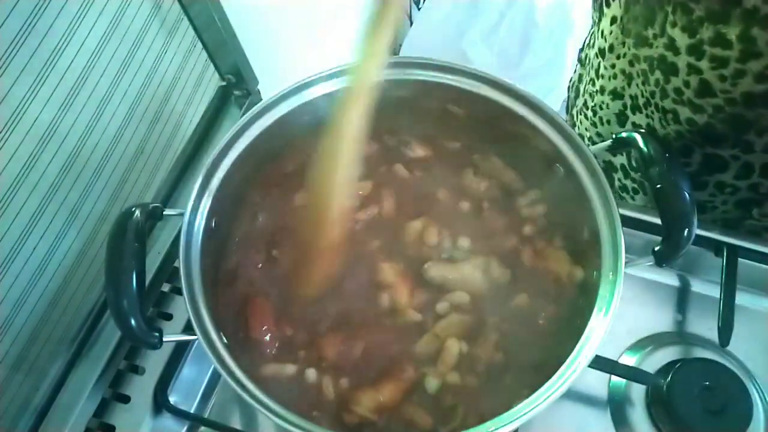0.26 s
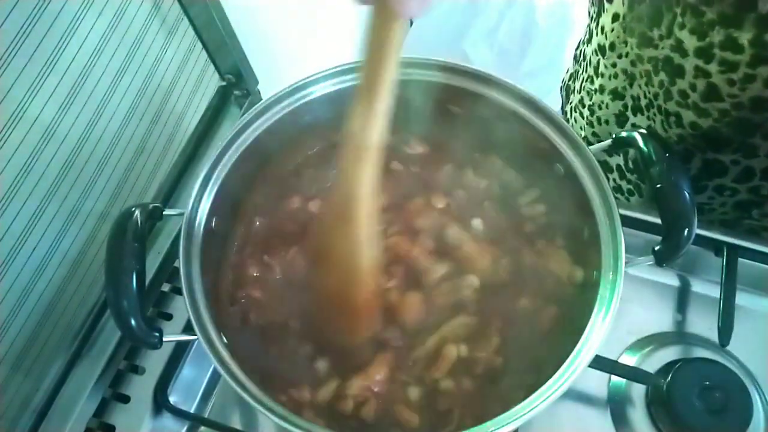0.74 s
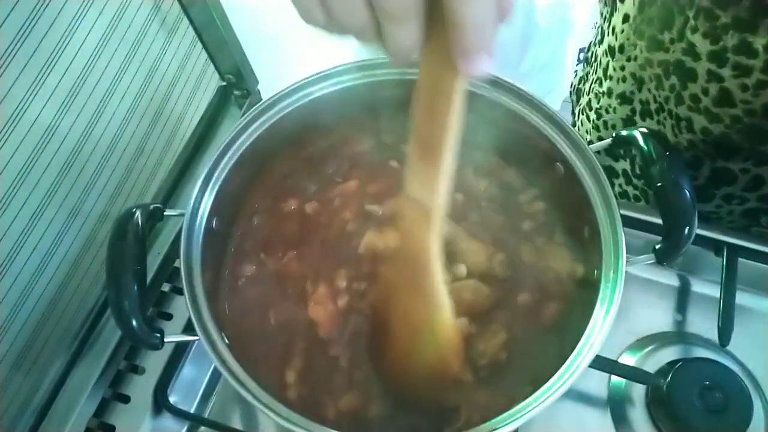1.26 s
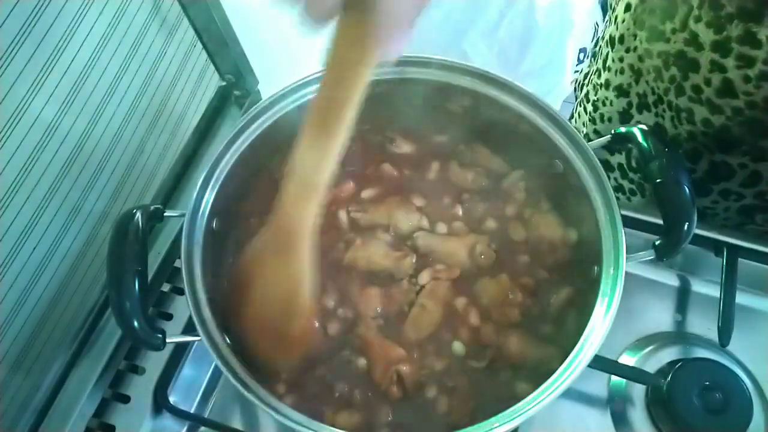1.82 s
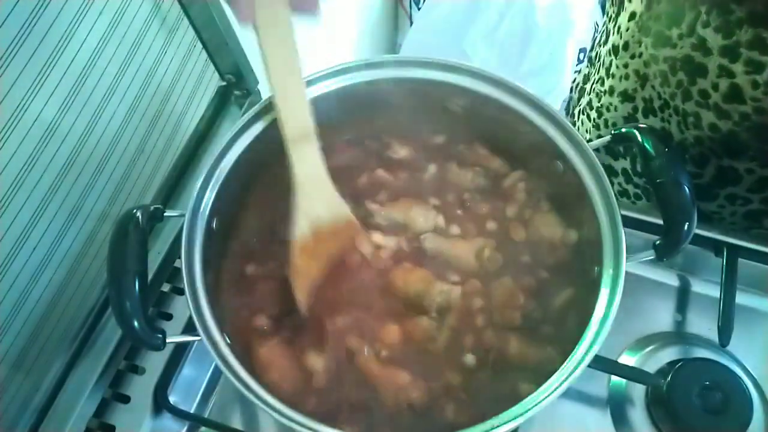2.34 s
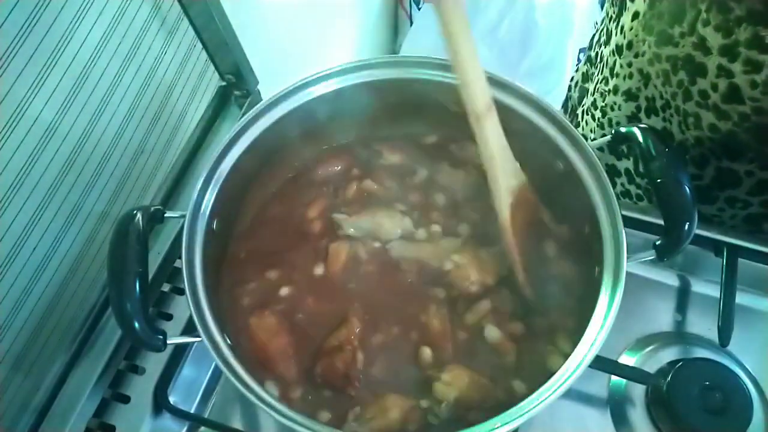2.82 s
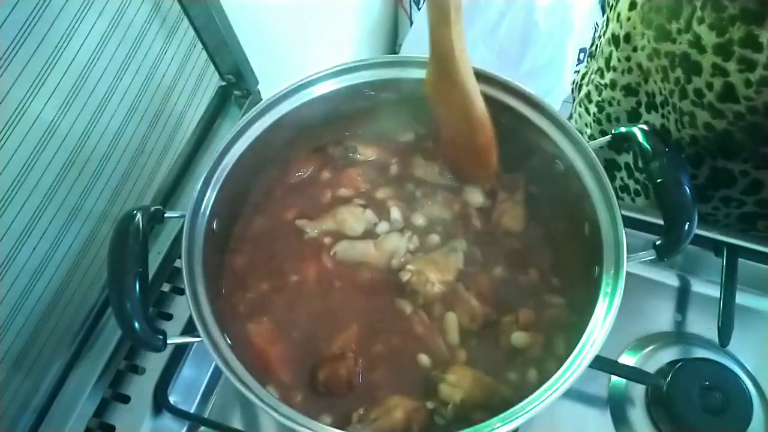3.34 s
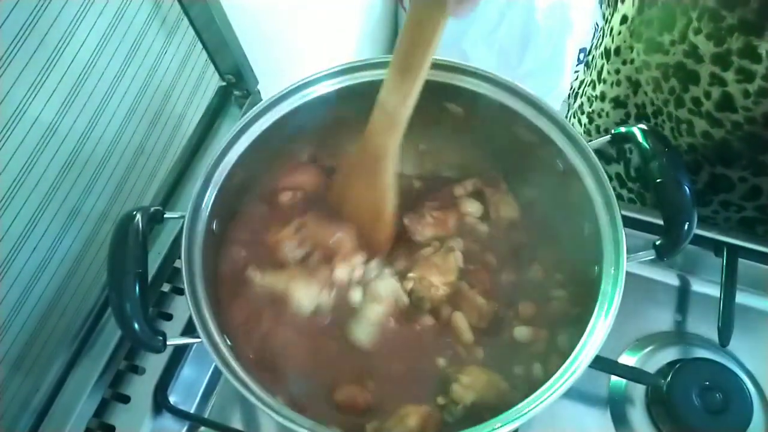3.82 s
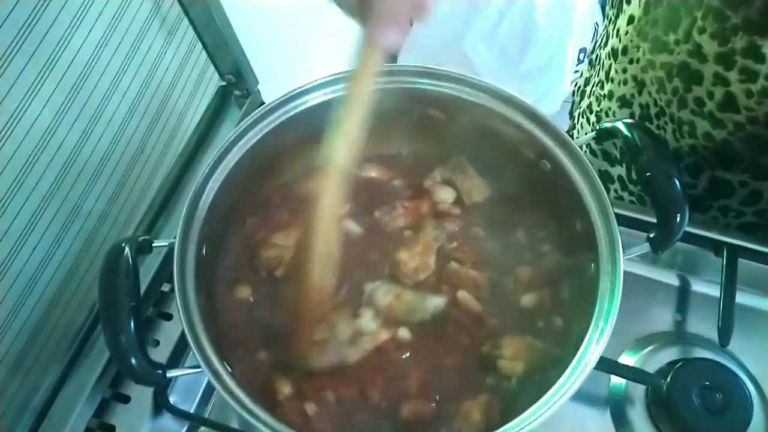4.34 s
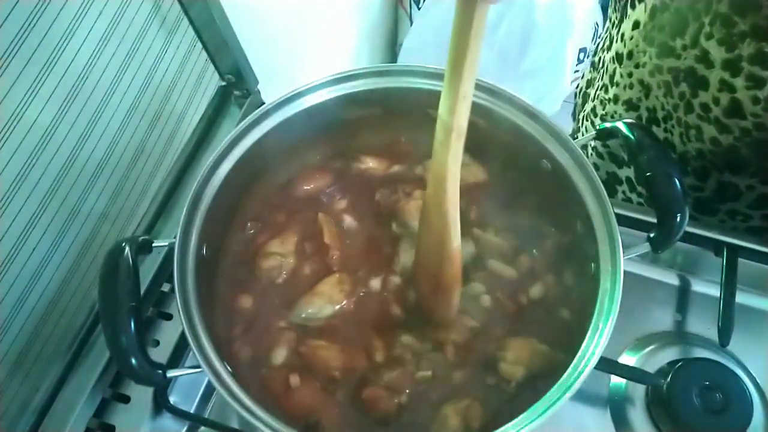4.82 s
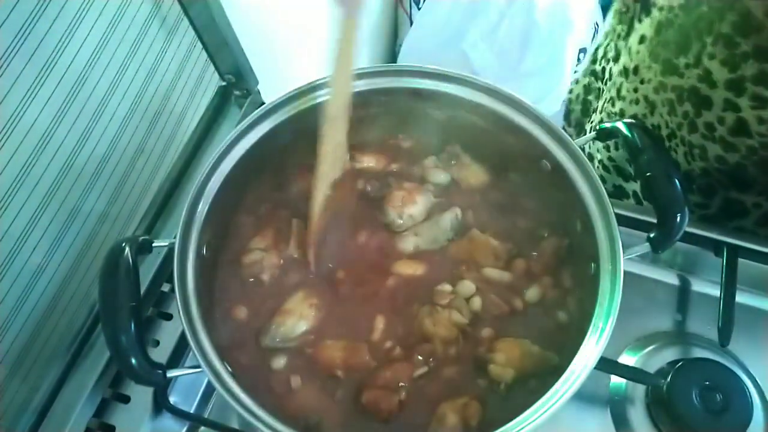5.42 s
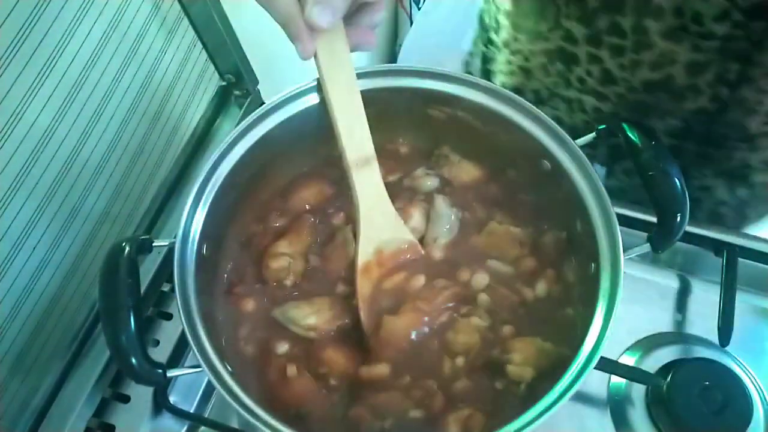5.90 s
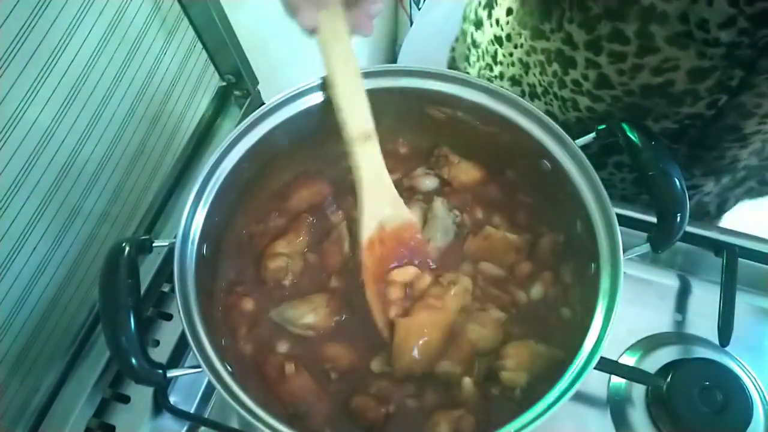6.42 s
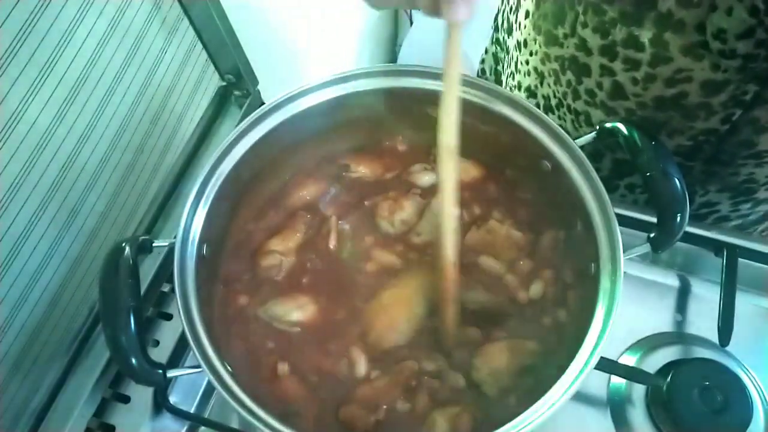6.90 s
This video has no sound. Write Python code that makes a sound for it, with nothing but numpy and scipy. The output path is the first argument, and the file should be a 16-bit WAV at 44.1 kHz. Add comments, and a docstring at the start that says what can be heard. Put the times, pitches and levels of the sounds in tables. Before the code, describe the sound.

A wooden spoon stirs thick stew in a steel pot, with wet sloshes, crackling spits, small bubbly plops and dull knocks on the metal.

```python
"""A hard kitchen, heard close to the stove: a wooden spoon stirs a thick stew in a steel pot.
Ringing drops and filtered noise slosh and crackle; air pockets and dribbles are decaying sines of rising pitch.
The spoon's knocks are a falling thud, a crack and damped pot modes; the room answers with sparse echoes.
Shaped noise gives the low steady hum and a few soft bumps."""
import sys
import numpy as np
from scipy import signal
from scipy.fft import rfft, irfft, next_fast_len
from scipy.io import wavfile
from scipy.ndimage import uniform_filter1d

SR = 44100
rng = np.random.default_rng(int(sys.argv[2]) if len(sys.argv) > 2 else 0)


def dump(signal):
    """Clip the signal to [-1, 1] and save it as 16-bit WAV at the path in sys.argv[1]."""
    limited = np.clip(np.atleast_2d(signal).T, -1, 1)
    pcm = np.round(limited * 32767).astype(np.int16)
    wavfile.write(sys.argv[1], SR, pcm)


N = 315747

# spectrum of small drops and spits, with a bright ridge near 10 kHz over all of it: (frequency [Hz], relative
# density [dB per Hz])
FINE_SPECTRUM = [(1790, -33), (2270, -24), (3030, -7.5), (3690, -18.5), (4120, -7), (4420, -5.5),
                 (7030, -1), (7690, -4.5), (9300, -4.5), (10100, 7), (11100, 4.5), (11900, -6), (14800, -7),
                 (16000, -24)]
# spectrum of large drops: (frequency [Hz], relative density [dB per Hz])
COARSE_SPECTRUM = [(200, -11), (500, -11), (1100, -6.5), (1900, -5), (2400, 0.5), (3200, 2.5), (4500, 1.5),
                   (8000, -30.5)]
# likeness of a diffuse field at the two ports: (frequency [Hz], left-right likeness [0 to 1])
LIKENESS = [(50, 0.93), (125, 0.86), (250, 1), (500, 0.4), (1000, 0.15), (3000, 0.195)]


def gain_of(db):
    """Amplitude is the exponential of level: 20 dB is a factor of ten."""
    return 10 ** (np.asarray(db) / 20)


def evened(x):
    """Division by the root mean square gives unit power."""
    return x / np.sqrt(np.mean(x ** 2) + 1e-20)


def read(points, hz):
    """Interpolates a curve over log frequency, since hearing follows frequency ratios."""
    f, value = np.transpose(points)
    return np.interp(np.log(hz + 1), np.log(f + 1), value)


def causal(points):
    """Minimum phase: the Hilbert transform of log gain gives the most compact causal pulse, here of peak 1."""
    level_db = read(points, abs(np.fft.fftfreq(4096, 1 / SR)))
    log_gain = np.log(gain_of(np.maximum(level_db, -70)))
    pulse = np.fft.ifft(np.exp(np.conj(signal.hilbert(log_gain)))).real[:1024]
    return pulse / abs(pulse).max()


def add(mix, s, sound, pan_db, lag_ms):
    """Level and arrival-time differences place a sound between two microphone ports; the left hears it later."""
    lead = 64  # samples of room for the ripple ahead of a fractional delay
    size = next_fast_len(len(sound) + 256)
    delay_s = np.array([[lag_ms], [0]]) / 1000 + lead / SR
    turn = np.exp(-2j * np.pi * np.fft.rfftfreq(size, 1 / SR) * delay_s)
    pair = irfft(rfft(sound, size) * turn, size) * gain_of([[pan_db / 2], [-pan_db / 2]])
    at = round(s * SR) - lead
    part = mix[:, max(at, 0):at + size]
    part += pair[:, max(-at, 0):][:, :part.shape[1]]


def partly_alike(left, other, hz):
    """Partial coherence: the right port shares part of the left spectrum, the rest is independent."""
    same = np.clip(read(LIKENESS, hz), -1, 1)[:, None]
    return np.array([left, same * left + np.sqrt(1 - same ** 2) * other])


def smoothed_noise(shape, width):
    """Two running means over the last axis leave only slow random fluctuation."""
    return uniform_filter1d(uniform_filter1d(rng.standard_normal(shape), width), width)


def burst(ms):
    """Impulsive excitation: a sharp click and noise that decays exponentially with time constant ms."""
    t = np.arange(900) / SR
    return (rng.standard_normal(900) + 2.2 * (t == 0)) * np.exp(-1000 * t / ms)


def swells(peak_s, peak_db, rise_db_per_s, fall_db_per_s):
    """Power addition of overlapping swells, each with exponential rise and decay, as a level in dB."""
    step = 64  # samples between computed levels
    late = np.arange(0, N + step, step) / SR - peak_s[:, None]
    slope_db = np.where(late < 0, rise_db_per_s[:, None] * late, -abs(fall_db_per_s)[:, None] * late)
    each_db = peak_db[:, None] + slope_db
    total_db = 10 * np.log10((gain_of(each_db) ** 2).sum(0) + 1e-20)
    return np.interp(np.arange(N) / step, np.arange(late.shape[1]), total_db)


def stirred():
    """Power addition of sloshes and a steady simmer: levels in dB of the small and the large drops."""
    # sloshes thrown up by pushes of the spoon: (peak time [s], peak level [dB], rise [dB/s], decay [dB/s],
    # weight of the large drops [dB])
    pushes = [(0.0, -57.5, 300, 38, -11), (0.454, -55.5, 600, 157, -10), (0.556, -47.5, 312, 80, -6),
              (.828, -55.5, 196, 100, -17), (0.974, -48, 2000, 97, -15), (1.163, -50.5, 402, 63, -7.5),
              (1.40, -62.5, 188, 66, -9), (1.559, -60.5, 298, 51, -10.5), (1.785, -56, 117, 128, -7.5),
              (1.925, -54, 2000, 54, -3), (2.1, -46.5, 198, 108, -11), (2.208, -41, 1500, 156, -7.5),
              (2.36, -55.5, 148, 25.5, -9.5), (2.739, -53.5, 1500, 56, -31), (3.158, -56.5, 989, 83, -5.5),
              (3.466, -38, 5000, 116, -1.5), (3.67, -55, 498, 88, -1), (3.886, -35.5, 283, 52, -15.5),
              (3.984, -32, 120, 54, -9.5), (4.495, -52, 130, 130, -13.5), (4.672, -66, 1497, 54, -6),
              (4.834, -51.5, 219, 51, -12), (5.325, -43, 377, 80, -3.5), (5.592, -55, 207, 116, 0.5),
              (5.902, -48.5, 2000, 148, 3), (6.155, -52, 159, 79, -6.5), (6.319, -59.5, 600, 66, -2),
              (6.499, -44, 998, 70, -15.5), (6.79, -55.5, 298, 51, -12), (6.939, -54.5, 295, 57, -10.5),
              (7.049, -54, 202, 134, -8)]
    s, small_db, rise, fall, weight_db = np.transpose(pushes)
    simmer_db, simmer_weight_db = -66, -13  # small drops; large drops relative to them
    levels = []
    for peak_db, bed_db in ((small_db, simmer_db), (small_db + weight_db, simmer_db + simmer_weight_db)):
        slosh_db = swells(s, peak_db, rise, fall)
        levels.append(10 * np.log10(gain_of(slosh_db) ** 2 + gain_of(bed_db) ** 2))
    return levels


def grains(count, low_hz, high_hz, per_s, spread_db, cycles, rise):
    """Shot noise: short damped oscillations at random moments, each pitch from its own spot in the pot."""
    size = gain_of(spread_db * np.minimum(rng.exponential(1, N), 4)) * (rng.random(N) < per_s / SR)
    kind, out = rng.integers(0, count, N), np.zeros((2, N))
    for k, hz in enumerate(np.geomspace(low_hz, high_hz, count)):
        turns = np.arange(int(60 * SR / hz)) * hz / SR
        ring = np.sin(2 * np.pi * turns * (1 + rise * turns))
        grain = ring * np.exp(-turns / cycles) * (turns < 6 * cycles)
        sound = signal.oaconvolve(size * (kind == k), grain * np.sqrt(hz))[:N]
        pair = np.array([np.roll(sound, rng.integers(0, 24)), sound])  # left later by up to 23 samples
        out += pair * gain_of(rng.normal(0, 2.5) * np.array([[1], [-1]]))
    return evened(out)


def slosh():
    """Superposed random drops in clumps over a wet hiss: small ones fizz, large ones patter."""
    small_db, large_db = stirred()
    small = grains(count=24, low_hz=2207, high_hz=13810, per_s=6500, spread_db=6.0, cycles=12.4, rise=0.015)
    large = grains(count=12, low_hz=786, high_hz=5200, per_s=1200, spread_db=-1.0, cycles=0.3, rise=0.0186)
    out = np.zeros((2, N))
    for spectrum, db, drops, hiss in ((FINE_SPECTRUM, small_db, small, .9),
                                      (COARSE_SPECTRUM, large_db, large, .8)):
        clumps = gain_of(1.1 * evened(smoothed_noise(N, 300)))
        wet = (drops + hiss * rng.standard_normal((2, N))) * clumps
        coloured = signal.oaconvolve(wet, causal(spectrum)[None])[:, :N]
        out += gain_of(db) * evened(coloured)
    return out * gain_of([[-.4], [.4]])


def patchy(x, depth_db):
    """Time-frequency modulation: patches drift alike at both ports, shallower in a dense, heavy rush."""
    z = signal.stft(x, nperseg=512, noverlap=384)[2]
    field = rng.standard_normal(z.shape[1:])
    field = uniform_filter1d(uniform_filter1d(field, 7, 0), 14, 1)  # over 7 bands, then 14 frames
    level_db = np.interp(np.arange(z.shape[2]) * 128, np.arange(N), stirred()[0])
    loose = np.clip((-34 - level_db) / 22, .55, 1)
    z = z * gain_of(depth_db * loose * evened(field))
    return signal.istft(z, nperseg=512, noverlap=384)[1][:, :N]


def crackle():
    """Random impulse train: scattered small spits, louder where the broth sloshes harder."""
    level_db = np.minimum(stirred()[0], -43)  # a heavy rush covers them
    size_db = 6. * np.minimum(rng.exponential(1, N), 3) + .75 * level_db - 10.
    train = (rng.random(N) < 45 / SR) * gain_of(size_db)  # about 45 per second
    crack = np.convolve(burst(ms=.7), causal(FINE_SPECTRUM))
    sound = signal.oaconvolve(train, crack / abs(crack).max())[:N]
    return np.array([np.roll(sound, shift=11) * gain_of(-4), sound])


def dribble():
    """Bubble resonance: a loose run of small overlapping bubbles, each rising in pitch."""
    # broth dribbling off the spoon: (peak time [s], peak level [dB], rise [dB/s], decay [dB/s])
    runs = [(0.0, -57, 100, 152), (2.45, -67.5, 32, 90), (3.52, -55, 600, 32), (5.9, -55, 147, 29.5),
            (6.6, -58, 99, 80)]
    level_db = swells(*np.transpose(runs))
    bubbles = grains(count=12, low_hz=900, high_hz=1285, per_s=190, spread_db=4.5, cycles=17.0, rise=0.00194)
    return gain_of(level_db) * bubbles


def floor():
    """Spectral shaping of noise: the burner's and the house's low steady noise, in drifting patches."""
    # background spectrum: (frequency [Hz], relative density [dB per Hz])
    spectrum = [(20, -25), (45, -2.5), (90, -1), (119, 8), (145, -10.5), (180, 7.5), (230, -9.5),
                (330, -9.5), (700, -10), (1200, -14.5), (2000, -19), (3500, -22), (6000, -105)]
    frames, hz = N // 1024 + 5, np.fft.rfftfreq(4096, 1 / SR)
    a, b, c, d, patches = rng.standard_normal((frames, 2049, 5)).T
    patches = evened(uniform_filter1d(uniform_filter1d(patches, 12, 0), 4, 1))
    z = partly_alike(a + 1j * b, c + 1j * d, hz)
    z *= gain_of(read(spectrum, hz)[:, None] + 2. * patches)
    noise = signal.istft(z, nperseg=4096, noverlap=3072)[1][:, :N]
    return gain_of(-74.5) * evened(noise)


def knocks():
    """Modal excitation: a clack of falling pitch wakes the modes near the blow's centre.
    The stew lies differently at every blow and keeps shaking the wall, so the modes shift a little
    and ring roughly, the high ones most."""
    # spoon on pot: (time [s], blow level [dB], centre of the blow [Hz], ring [dB], boom [dB], crack [dB],
    # clang [dB], left-right difference [dB])
    blows = [(.002, -39, 410, -17, -15, -4.5, -40, 5.5), (0.6054, -34.5, 500, -39, -26.5, -19, -44, 7),
             (0.9776, -28.5, 625, -24, -44, 11.5, -26.5, 7), (1.92, -33.5, 704, -23.5, -18.5, -4, -18.5, 5),
             (2.1673, -35.5, 730, -44, -41, -24, -44, 7), (2.737, -47, 683, -26, -62, 10, -36, 13.5),
             (3.467, -25, 710, -25.5, -14, 5, -15.5, 3), (3.535, -28, 1830, -38, -14.5, -7, -14.5, 3),
             (5.277, -53.5, 666, -29, -58, 13, -30, 33), (5.451, -19, 581, -28, -20, -3.5, -38, 3),
             (5.914, -33, 196, -43, -10, -4, -31, 9)]
    # modes of the full pot on its grate: (frequency [Hz], level [dB], t60 [s])
    modes = [(148.7, -17.5, 0.8), (200, -0.5, 0.33), (251.5, -6.5, 0.56), (309.7, -8, 0.4),
             (370, 4.5, 0.33), (419, -6, 0.71), (572.8, 7.5, 0.22), (644.5, 8.5, 0.24), (728, 5, 0.18),
             (903, 23.5, 0.032), (1183, 17, 0.14), (1830, -1, 0.26), (2334, 5, 0.15), (2900, 9, 0.045)]
    out, t, coarse = np.zeros((2, N)), np.arange(0, 16000) / SR, causal(COARSE_SPECTRUM)
    pot_hz, mode_db, t60 = np.transpose(modes)[:, :, None]
    dying = gain_of(mode_db - 60 * t / t60) * (1 - np.exp(-pot_hz * t / 1.5))  # low modes build up slowly
    step = t * (22 + .065 * pot_hz)  # random knots passed, faster for high modes
    whole, ease = step.astype(int), np.sin(np.pi / 2 * (step % 1)) ** 2
    for s, db, centre_hz, ring_db, boom_db, crack_db, clang_db, pan_db in blows:
        hz = pot_hz * (1 + .02 * rng.standard_normal(pot_hz.shape))
        woken = gain_of(ring_db - 15. * abs(np.log2(pot_hz / centre_hz)))  # 15 dB less per octave away
        woken = woken + gain_of(boom_db) * (pot_hz < 330)
        woken = woken + gain_of(boom_db - 19.5) * (abs(pot_hz - 377) < 20)
        woken = woken + gain_of(clang_db) * (pot_hz > 1500)
        knots = rng.standard_normal((2, len(hz), 200))
        shake = [np.take_along_axis(k, whole, 1) * (1 - ease) + np.take_along_axis(k, whole + 1, 1) * ease
                 for k in knots]
        rough = shake[0] * np.sin(2 * np.pi * hz * t) + shake[1] * np.cos(2 * np.pi * hz * t)
        turns = centre_hz * t
        falling = np.sin(2 * np.pi * (0.68 * turns + 0.79 * (1 - np.exp(-turns / 1.7))))
        thud = falling * 2 * (1 - np.exp(-2 * turns)) * np.exp(-turns / 0.86)
        blow = thud + (woken * dying * rough).sum(0)
        crack = np.convolve(burst(ms=1.3), coarse)
        blow[:len(crack)] += gain_of(crack_db) * crack / abs(crack).max()
        add(out, s, gain_of(db) * blow, pan_db, lag_ms=0.12)
    return out


def kitchen(x):
    """Reverberation: sparse echoes of random sign, each band decaying at its own rate."""
    # reverberation time of the room: (frequency [Hz], t60 [s])
    decay = [(120, 0.76), (330, 0.32), (870, 0.57), (2300, 0.52), (6000, 0.055), (12000, 0.19)]
    taps = np.zeros((2, SR))
    slots = np.arange(200, SR - 20, 20)  # one echo in every 20 samples
    at = slots + rng.integers(0, 20, (2, (SR - 201) // 20))
    np.put_along_axis(taps, at, rng.choice([-1., 1.], at.shape), 1)
    hz, t, z = signal.stft(taps, SR, nperseg=512)
    z = partly_alike(z[0], z[1], hz)
    z = z * gain_of(-60 * t / read(decay, hz)[:, None])
    tail = signal.istft(z, SR, nperseg=512)[1]
    return signal.fftconvolve(x.mean(0)[None], tail / np.linalg.norm(tail[0]), axes=1)[:, :N]


def gurgles():
    """Bubble resonance: a closing air pocket plops, rings on faintly and rises in pitch as it shrinks."""
    # air pockets closing: (time [s], level [dB], nominal pitch [Hz], left-right difference [dB])
    pockets = [(0.105, -53.5, 761, 2), (0.106, -58.5, 1130, -8), (0.496, -66.5, 627, 14),
               (0.531, -64.5, 573, 17), (0.544, -45, 1720, 4.5), (0.552, -56.5, 703, 0),
               (0.564, -50, 1710, 6), (0.588, -52, 1680, 5), (0.628, -61, 770, 4),
               (1.326, -56, 1250, -14.5), (1.35, -56, 1270, -8), (1.395, -60.5, 1240, -12),
               (1.531, -69, 616, 20), (1.74, -68.5, 686, 9), (2.07, -37, 1750, 2), (2.196, -60, 648, 15),
               (2.221, -57, 813, 16), (2.438, -54.5, 738, 1), (2.519, -60.5, 798, -5),
               (2.873, -66.5, 708, 8), (2.971, -69, 693, 11), (3.728, -47.5, 1143, 0),
               (3.762, -59.5, 700, 9), (5.0, -64, 634, 19.5), (5.072, -62.5, 707, 14),
               (5.101, -61.5, 750, 4), (5.186, -50.5, 3060, -4), (5.573, -52, 2860, 0),
               (5.905, -48.5, 928, -4), (6.113, -62, 900, 7), (6.199, -66, 1087, -5), (6.284, -65, 1020, 7),
               (6.398, -56, 1103, -2), (6.4, -70.5, 640, 18), (6.416, -60, 698, 8), (6.495, -60.5, 660, 19),
               (6.574, -61.5, 516, 9), (6.593, -59, 578, 7), (6.605, -57, 1045, -12), (6.694, -51, 698, 3),
               (6.719, -61, 610, 4), (6.796, -69, 728, 25)]
    out, t = np.zeros((2, N)), np.arange(6000) / SR
    for s, db, hz, pan_db in pockets:
        ring = np.sin(2 * np.pi * hz * t * (.97 + 2.02 * t))
        onset = 1 - np.exp(-hz * t)
        decay = 2.12 * np.exp(-hz * t / 3.9) + 0.92 * np.exp(-hz * t / 16.3)  # plop and faint ring
        add(out, s, gain_of(db) * ring * onset * decay, pan_db, lag_ms=0.27)
    return out


def spits():
    """Filtered impulses: each loud spit is a short crack with a bright and a duller part."""
    # single loud spits: (time [s], level [dB], left-right difference [dB])
    cracks = [(0.269, -43, -19), (0.7735, -46, -32), (0.8299, -35.5, -14), (1.3957, -33.5, -7),
              (1.732, -36.5, -12), (2.2056, -20.5, -1), (2.394, -33.5, -9), (2.628, -33, -8),
              (2.6834, -46, -35.5), (2.739, -26, 2), (2.828, -47.5, 33), (2.781, -41.5, -23),
              (3.046, -48, -10), (3.083, -38.5, -11), (3.1555, -38, -18), (3.349, -45, -27.5),
              (3.473, -18, -6), (3.6663, -26.5, 12), (3.8601, -28.5, 16), (3.886, -17, -2),
              (3.9647, -19.5, 11), (3.989, -19, 2), (4.0364, -18.5, -7), (4.2361, -28, 14),
              (4.3244, -27, -16), (4.331, -32, 18), (4.6684, -35.5, -11), (5.2793, -30, -4),
              (5.9066, -36.5, -16), (6.061, -39.5, -17.5), (6.1432, -42, -28), (6.499, -21, 2),
              (6.65, -36, 0), (6.6971, -28, 2), (6.7687, -32, -9), (7.147, -39.5, -24.5)]
    out, fine, coarse = np.zeros((2, N)), causal(FINE_SPECTRUM), causal(COARSE_SPECTRUM)
    for s, db, pan_db in cracks:
        push = burst(ms=1.4)
        bright = np.convolve(push, fine)
        dull = np.convolve(push, coarse)
        bright = signal.lfilter([1, .8], 1, bright)  # the highest treble is softer than in the fizz
        crack = bright / abs(bright).max() + gain_of(-9.5) * dull / abs(dull).max()
        add(out, s, gain_of(db) * crack, pan_db, lag_ms=0.207)
    return out


def bumps():
    """Amplitude modulation of a low carrier by slow noise gives short swells of narrow-band noise."""
    # soft low bumps: (time of the middle [s], level [dB], centre frequency [Hz])
    soft = [(1.029, -59, 108.6), (1.769, -61.5, 126.5), (4.001, -62.5, 59.3), (4.12, -61, 285),
            (5.525, -59.5, 107), (5.982, -52.5, 113), (6.331, -68.5, 113)]
    out, t = np.zeros((2, N)), np.arange(-4000, 4000) / SR
    for s, db, hz in soft:
        slow = smoothed_noise((2, len(t)), 500)
        swell = evened(slow[0] * np.cos(2 * np.pi * hz * t) + slow[1] * np.sin(2 * np.pi * hz * t))
        add(out, s + t[0], gain_of(db) * swell * np.hanning(len(t)), pan_db=2.5, lag_ms=0)
    return out


def scene():
    """Superposition of the direct sounds, their reverberation, the bumps and the floor."""
    drops = patchy(slosh(), depth_db=4.)
    cracks = spits() + crackle()
    bubbles = gurgles() + dribble()
    blows = knocks()
    echoed = gain_of(-17.0) * drops + gain_of(-9.0) * cracks + gain_of(-8.0) * bubbles + gain_of(-7.5) * blows
    near = drops + cracks + bubbles + blows + kitchen(echoed)
    high_pass = signal.butter(4, 130, "high", fs=SR, output="sos")
    thin = signal.sosfilt(high_pass, near)  # a small pot radiates no deep bass
    return thin + bumps() + floor()


def record(dry):
    """Band limitation: a linear-phase low-pass at 16 kHz."""
    low_pass = signal.firwin(511, 16000, window=("kaiser", 9), fs=SR)
    return signal.oaconvolve(dry, low_pass[None], "same")


dry = scene()
out = record(dry)
dump(out)
```